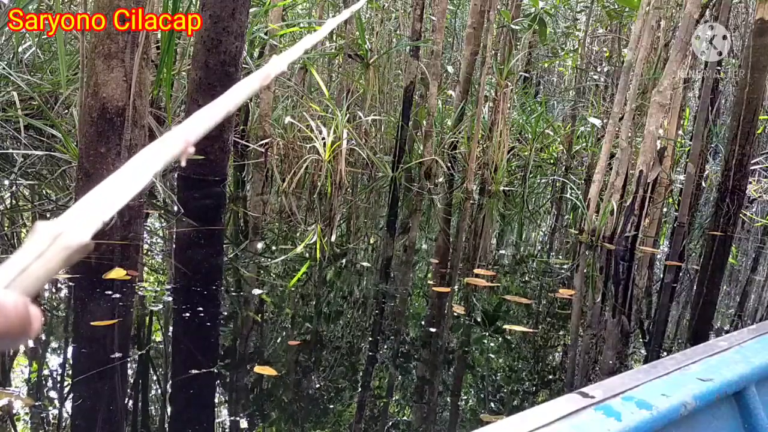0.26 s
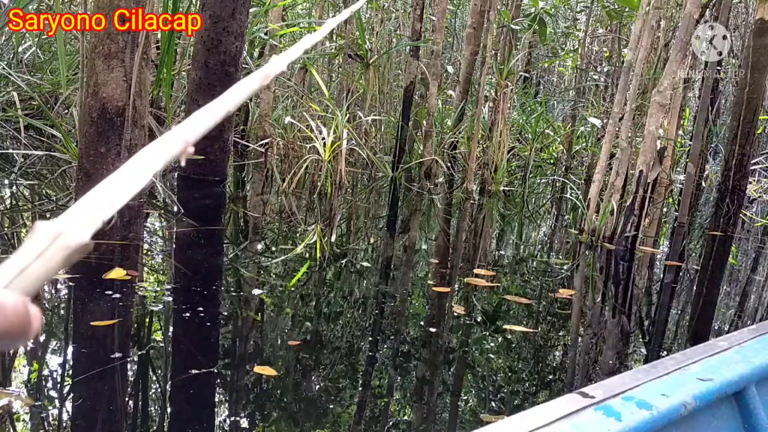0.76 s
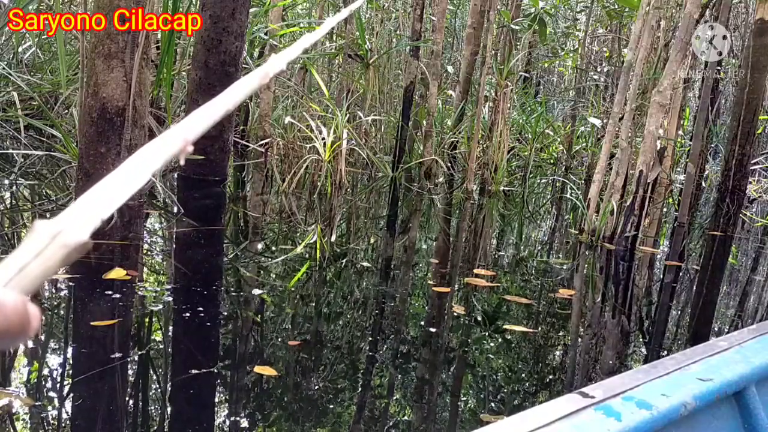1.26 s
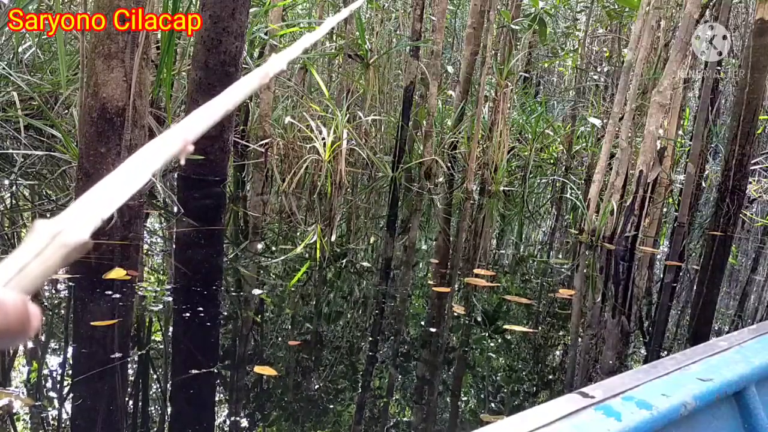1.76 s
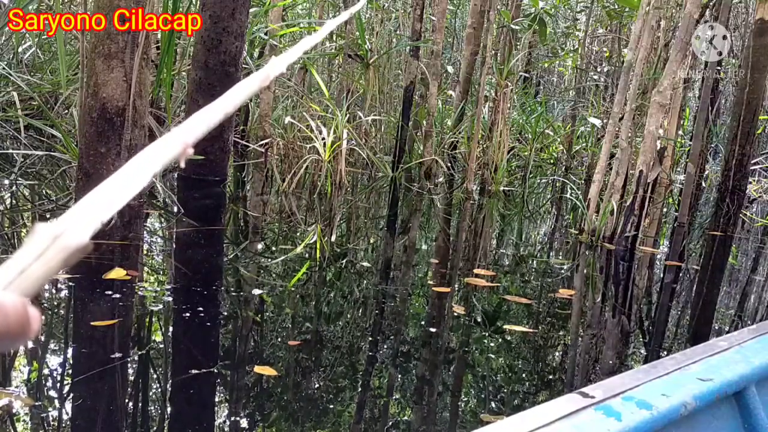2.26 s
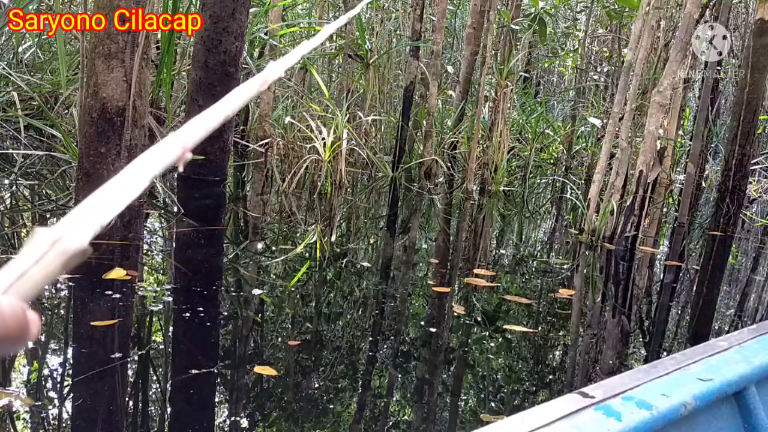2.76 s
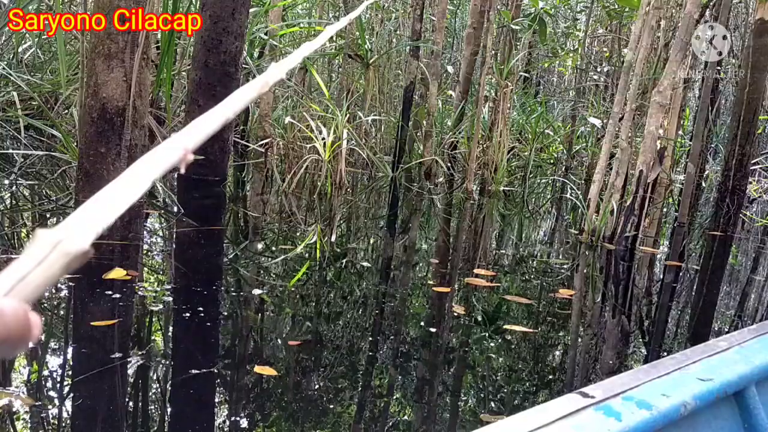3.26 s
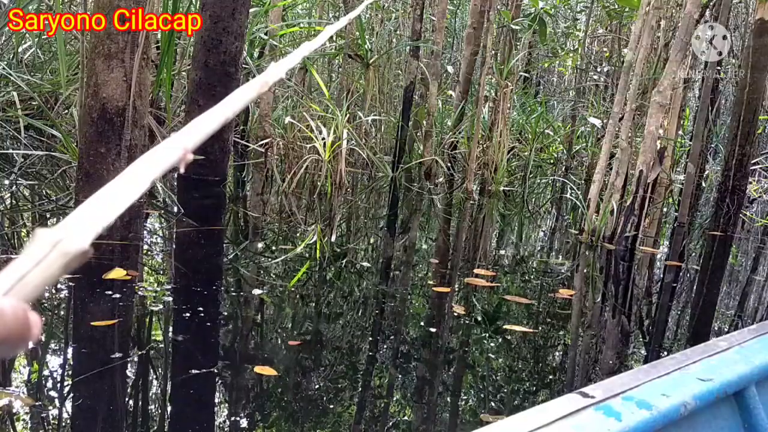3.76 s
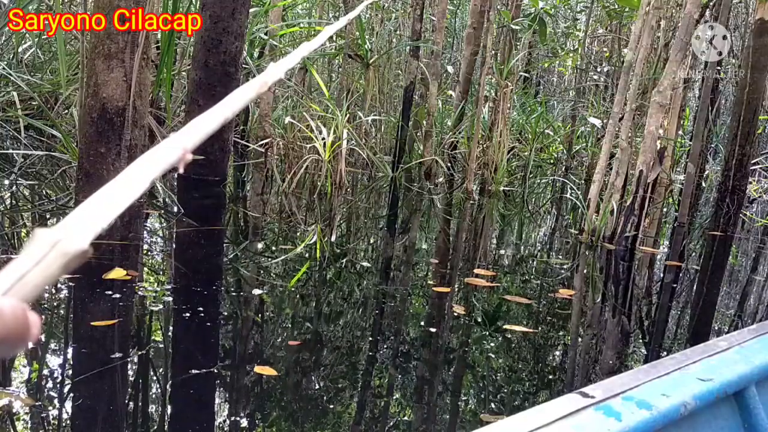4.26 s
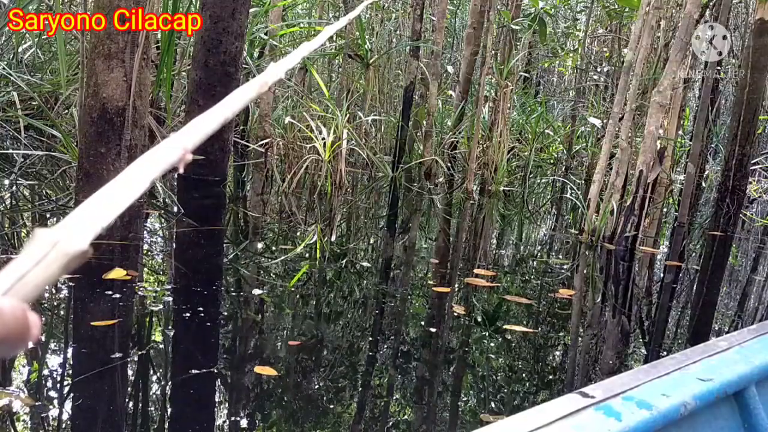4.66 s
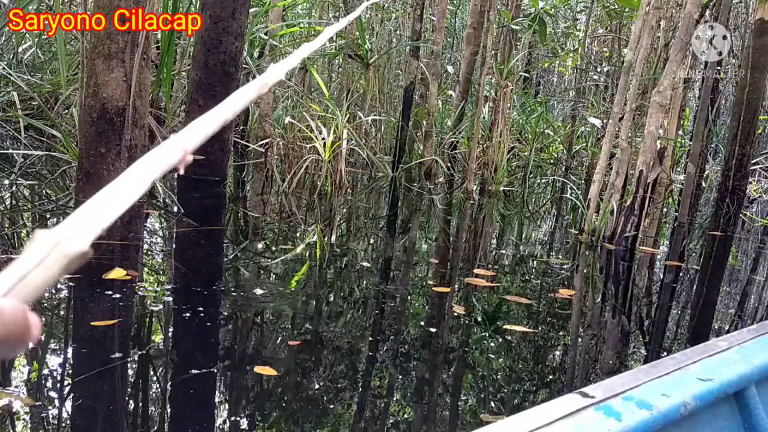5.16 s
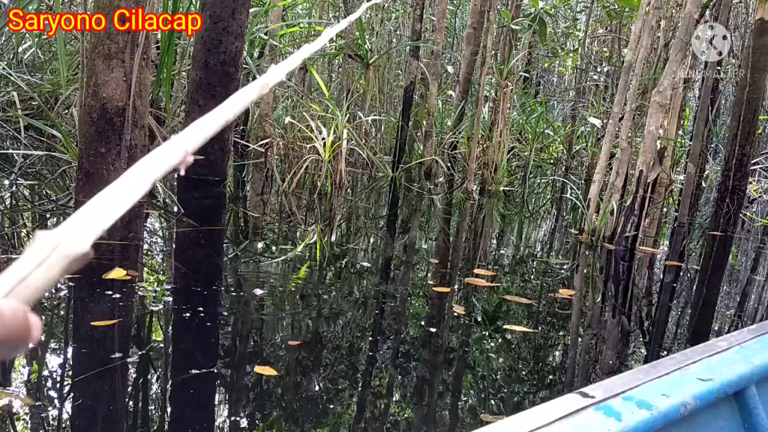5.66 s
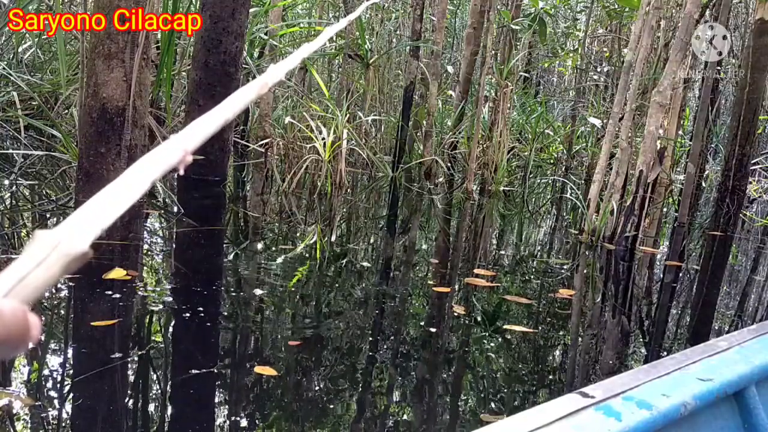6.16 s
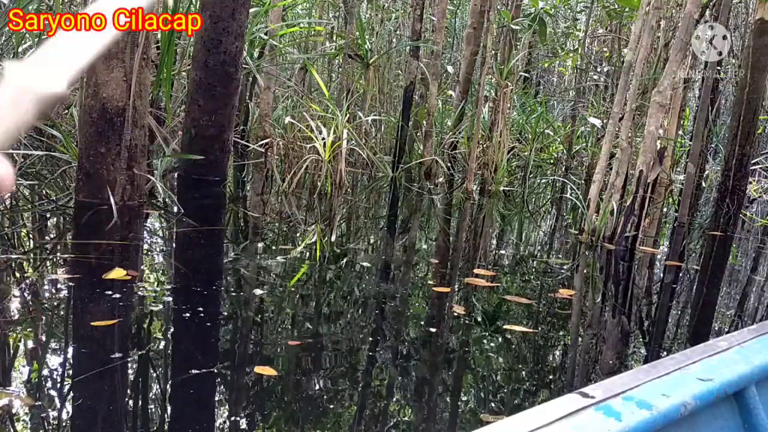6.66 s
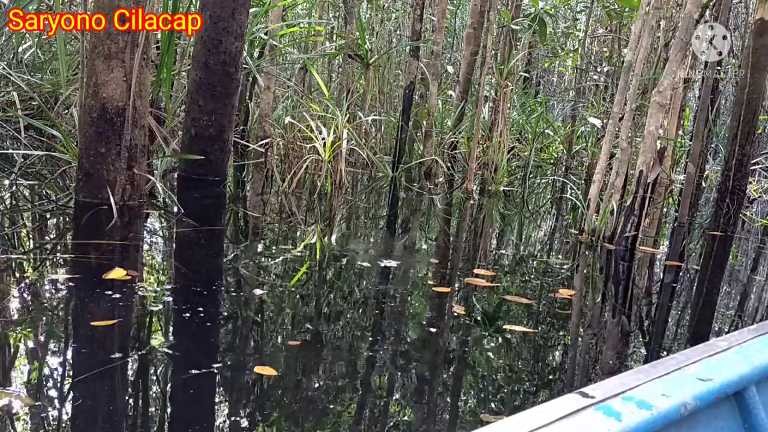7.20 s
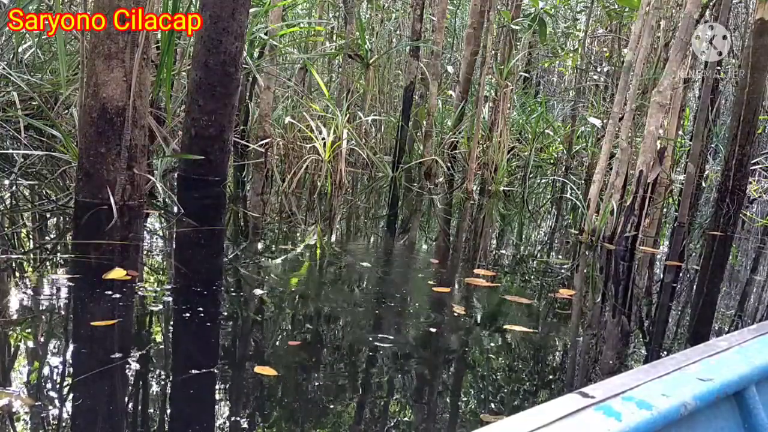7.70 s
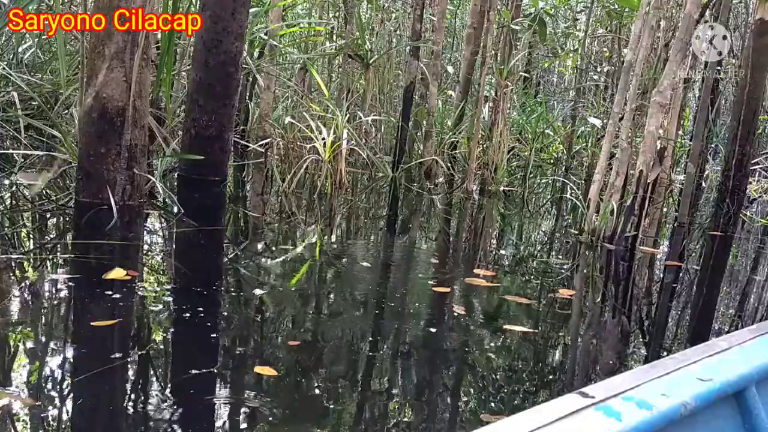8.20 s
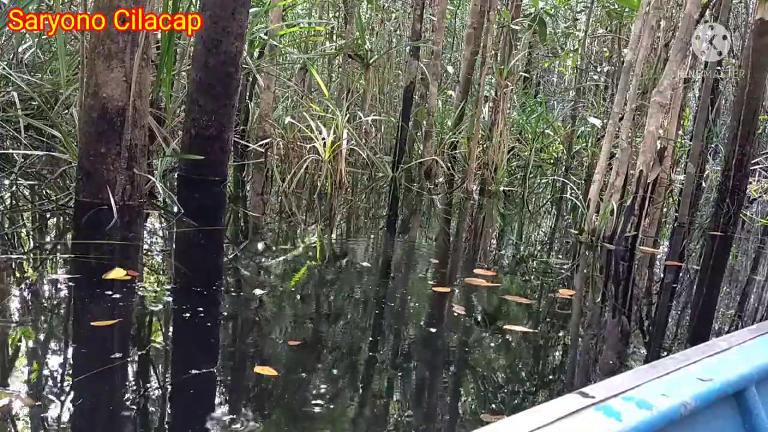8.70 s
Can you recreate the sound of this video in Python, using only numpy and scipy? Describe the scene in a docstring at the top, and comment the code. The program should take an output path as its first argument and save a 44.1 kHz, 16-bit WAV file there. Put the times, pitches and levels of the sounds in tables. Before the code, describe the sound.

Short bird whistles and ticks over a pulsing cicada buzz in a flooded forest, with gentle lapping water and a faint engine hum.

```python
"""A flooded forest, from a small boat. A near cicada clicks so fast that it drones, its belly pumping a
throb into the sound as it winds up; other insects scrape over a far chorus. One bird whistles
short glides and another ticks, with a faint echo from the trunks. Water gurgles along the hull as air
pockets ring, and a distant engine hums at multiples of its shaft rate."""
import sys
import numpy as np
from scipy import signal
from scipy.fft import rfft, irfft, next_fast_len
from scipy.io import wavfile
from scipy.ndimage import uniform_filter1d

SR = 44100
rng = np.random.default_rng(int(sys.argv[2]) if len(sys.argv) > 2 else 0)


def unload_audio(sound):
    """Save the sound as a 16-bit wav file, at the path given as the first command line argument."""
    columns = np.transpose(np.atleast_2d(sound))
    # keep every value between -1 and 1, then stretch to whole-number steps
    steps = np.round(np.clip(columns, -1, 1) * 32767)
    wavfile.write(sys.argv[1], SR, steps.astype(np.int16))


N = 394233
TIME_S = np.arange(N) / SR


def undb(db):
    return 10 ** (np.asarray(db) / 20)


def level(x, rms_db):
    return x * undb(rms_db) / np.sqrt(np.mean(x ** 2))


def phase_of(hz):
    return 2 * np.pi * np.cumsum(hz) / SR


def curves(table):
    """Every column after the time, as a value per sample."""
    time_s, *columns = np.transpose(table)
    return [np.interp(TIME_S, time_s, column) for column in columns]


def colour(x, eq):
    """Filter by an EQ curve; nothing passes below its first row."""
    size = next_fast_len(N)
    freq_hz, gain_db = np.transpose(eq)
    log_hz = np.log(np.arange(1, size // 2 + 2) * SR / size)
    db = np.interp(log_hz, np.log(freq_hz), gain_db, left=-120)
    return irfft(rfft(x, size) * undb(db), size)[..., :N]


def drift(rate_hz):
    """Smooth random modulation with a spread near 1."""
    hold = int(SR / rate_hz)
    steps = np.repeat(rng.standard_normal(N // hold + 1), hold)
    return 1.284 * uniform_filter1d(uniform_filter1d(steps, hold), hold)[:N]


def roughness(samples, depth, smooth_samples):
    """A gain that flickers around 1."""
    return 1 + depth * level(uniform_filter1d(rng.standard_normal(samples), smooth_samples), 0)


def place(out, start_s, sound, pan_db):
    """Mix in a one-shot; positive pan is to the left."""
    i = int(start_s * SR)
    sound = sound[:N - i]
    out[:, i:i + len(sound)] += sound * undb([[pan_db / 2], [-pan_db / 2]])


# The near cicada winding up: time_s, click_rate_hz, level_db
WIND_UP = [(0, 235, -76), (1.5, 238, -59), (2.1, 250.5, -50.5), (2.9, 252.6, -47.5), (3.7, 247.2, -46.5),
           (4.84, 244.2, -46), (5.4, 247.2, -45), (6.6, 249.4, -45), (7.4, 251, -46), (8.94, 260.4, -43.5)]
# Its tone colour: freq_hz, gain_db
CICADA_EQ = [(880, -50), (1500, -48), (2030, -3.5), (2200, -0.5), (2350, -10), (2700, 0.5), (3760, -7),
             (4850, 1), (5780, -7.5), (7820, -1.5), (9230, -15), (9990, -9), (13300, -20.5), (14500, -12),
             (15500, -48.5)]
def cicada(jitter=.0015, rasp=.42):
    """Even clicks make a comb of harmonics, each flickering and throbbing on its own; a rasp fills in."""
    click_rate_hz, level_db = curves(WIND_UP)
    phase = phase_of(click_rate_hz * (1 + jitter * drift(40)))
    comb = 0
    for k in range(6, 62):
        offset, throb_offset = 2 * np.pi * rng.random(2)
        comb += undb(3.05 * drift(14)) * throb(.99, throb_offset) * np.sin(k * phase + offset)
    effort = curves(BELLY_PUMP)[1]  # more effort, more even clicks
    song = (effort * level(comb, 0) + rasp * rng.standard_normal(N)) / np.hypot(effort, rasp)
    return level(colour(song, CICADA_EQ), level_db)


# The cicada's pumping belly: time_s, rate_hz, effort (0-1)
BELLY_PUMP = [(0, 20.7, 0.3), (2, 22, 0.29), (3.2, 22.5, 0.32), (4.0, 22.4, 0.26), (5, 22, 0.34),
              (5.8, 18.4, 0.31), (7.5, 18.1, 0.58), (8.1, 18, 0.28), (8.94, 17.8, 0.24)]
def throb(depth, offset_rad):
    """The belly pumps the level up and down, deeper with more effort."""
    rate_hz, effort = curves(BELLY_PUMP)
    return 1 + np.clip(depth * effort, 0, 1) * np.sin(phase_of(rate_hz) + offset_rad)


def follow_cicada(full_db, share, cicada_full_db=-45):
    """Level in dB of a layer that follows a share of the cicada's swell."""
    _, cicada_db = curves(WIND_UP)
    return full_db + share * (cicada_db - cicada_full_db)


def whistle(note, octave_db=-20, swing_hz=0):
    """A gliding sine with a faint octave, uneven breath and soft edges."""
    time_s, pitch_hz, level_db = np.transpose(note)[:3]
    t = np.arange(time_s[0], time_s[-1], 1 / SR)
    phase = phase_of(uniform_filter1d(np.interp(t, time_s, pitch_hz), 60) + swing_hz)
    tone = np.sin(phase) + undb(octave_db) * np.sin(2 * phase)
    edges = np.clip(np.minimum(t - time_s[0], time_s[-1] - t) / .0006, 0, 1)
    breath = roughness(len(t), depth=.27, smooth_samples=120)
    return np.sqrt(2) * undb(np.interp(t, time_s, level_db)) * edges * breath * tone


def chirp_shape(start_s, length_s, start_hz, middle_hz, end_hz, peak_db, peak_at=.32, edge_db=-9.5):
    """Breakpoints of a short whistle: the pitch bends through three points while the level arches."""
    progress = np.linspace(0, 1, 9)
    pitch_hz = np.interp(progress, [0, .5, 1], [start_hz, middle_hz, end_hz])
    off_peak = np.interp(progress, [0, peak_at, 1], [1, 0, 1])
    return np.transpose([start_s + length_s * progress, pitch_hz, peak_db + edge_db * off_peak ** 2])


def trill(start_s=7.568, step_s=.017, note_s=.014, top_hz=2900, sink_hz=54.9, peak_db=-37):
    """Chirp rows for five even notes that sink in pitch."""
    hz = top_hz - sink_hz * np.arange(6)
    return [(start_s + k * step_s, note_s, hz[k + 1], hz[k], hz[k + 1], peak_db) for k in range(5)]


# Short whistles: start_s, length_s, start_hz, middle_hz, end_hz, peak_db
CHIRPS = [(1.482, 0.011, 3450, 2900, 2500, -46), (1.5, 0.02, 2300, 1890, 1914, -44),
          (1.622, 0.02, 5500, 5500, 4800, -40), (1.632, 0.0093, 10100, 9950, 10100, -50),
          (1.64, 0.012, 6200, 6100, 5900, -40.5), (1.648, 0.014, 5900, 4850, 4200, -34.5),
          (1.659, 0.01, 4200, 3650, 3100, -42), (1.895, 0.016, 2400, 2550, 2650, -47),
          (1.911, 0.025, 2560, 3060, 3050, -41.5), (2.15, .055, 4150, 4270, 4250, -50),
          (2.275, .019, 6030, 6540, 6700, -49), (2.295, 0.0085, 6000, 4700, 4500, -38),
          (2.307, 0.061, 4800, 4950, 5500, -39), (2.418, 0.021, 3100, 3590, 3520, -38),
          (2.433, 0.017, 2750, 2710, 2450, -38), (2.465, 0.016, 2180, 1900, 1600, -47),
          (2.525, .028, 2060, 2160, 2550, -44.5), (2.553, 0.011, 2350, 2020, 1710, -44),
          (2.655, 0.0206, 2020, 2100, 2310, -44.5), (2.679, 0.012, 2280, 1930, 1600, -43),
          (2.812, 0.014, 5680, 4630, 4430, -38.5), (2.82, 0.0087, 4460, 4700, 4950, -35.5),
          (2.837, 0.01, 4400, 3400, 3000, -35.5), (2.849, .029, 3000, 3840, 4450, -36.5),
          (2.879, 0.0061, 4400, 4750, 5000, -35), (3.005, 0.031, 1890, 1960, 1970, -51.5),
          (3.09, 0.052, 1627, 1700, 1700, -51), (3.13, 0.041, 1750, 1862, 1680, -49),
          (3.384, 0.015, 2960, 2770, 2690, -40.5), (3.402, 0.009, 2950, 3250, 3670, -40),
          (3.407, .021, 3580, 3570, 3600, -38.5), (3.463, 0.007, 3870, 4100, 4000, -35),
          (3.467, 0.0144, 4180, 3500, 3000, -36), (3.485, .011, 3950, 3200, 3750, -39.5),
          (4.49, 0.016, 4900, 4980, 4900, -48), (4.535, 0.018, 5030, 4950, 4930, -46),
          (4.585, .015, 5000, 5100, 5040, -47), (4.67, 0.038, 5150, 5280, 5040, -46),
          (5.125, .035, 3660, 3560, 3740, -50), (5.225, .018, 5750, 5700, 5620, -48),
          (5.245, .02, 3687, 3550, 3520, -51), (5.56, 0.087, 5120, 5000, 4840, -52),
          (6.455, .055, 3474, 3600, 3430, -48), (6.58, 0.077, 5080, 4800, 4250, -51.5),
          (6.925, 0.081, 5170, 5030, 4990, -52), (7.248, .031, 3945, 3290, 3000, -35.5),
          (7.29, .025, 3040, 2990, 2900, -42), (7.37, 0.036, 2150, 2110, 2070, -46),
          (7.765, 0.029, 1910, 1890, 1960, -48), (7.857, 0.032, 1685, 1680, 1690, -47),
          (7.884, 0.048, 1663, 1840, 1740, -45.5), (8.15, .085, 5600, 5380, 5220, -52),
          (8.154, 0.012, 2900, 2780, 2680, -39), (8.173, .012, 2914, 3650, 3520, -37),
          (8.183, 0.011, 3470, 3420, 3080, -33), (8.228, 0.018, 4270, 3760, 3180, -36),
          (8.247, .011, 4030, 3500, 3850, -43)]
# Long whistles, one list of breakpoints each: time_s, pitch_hz, level_db
GLIDES = [
    [(3.285, 2635, -46), (3.308, 2660, -45), (3.327, 2800, -40), (3.345, 2890, -50), (3.384, 3040, -41)],
    [(7.062, 3146, -39), (7.08, 3390, -37.5), (7.115, 3500, -36.5), (7.132, 3700, -37), (7.15, 3810, -32),
     (7.167, 3715, -39), (7.185, 2994, -45)],
    [(7.48, 2744, -53), (7.495, 2890, -42), (7.52, 2790, -38), (7.555, 2800, -38.5), (7.567, 2575, -39)],
    [(8.02, 2630, -56), (8.044, 2580, -45), (8.068, 2600, -41.5), (8.092, 2793, -36), (8.117, 2870, -43.5),
     (8.153, 2953, -42)],
    [(8.9, 4780, -38), (8.92, 4880, -42), (8.94, 4840, -35)],
]
# One buzzed note: time_s, pitch_hz, level_db, flutter_hz
BUZZ = [(1.744, 2950, -52, 199), (1.77, 3300, -40, 206), (1.79, 3380, -36.5, 192), (1.814, 3080, -40, 175),
        (1.835, 2650, -46, 175)]
def whistling_bird(pan_db=.2, swing_hz=233, flutter_depth=.34):
    """Glides, chirps, a trill and a buzz whose flutter lifts pitch and level together."""
    out = np.zeros((2, N))
    for note in GLIDES + [chirp_shape(*row) for row in CHIRPS + trill()]:
        place(out, note[0][0], whistle(note), pan_db)
    time_s, _, _, flutter_hz = np.transpose(BUZZ)
    t = np.arange(time_s[0], time_s[-1], 1 / SR)
    flutter = -np.cos(phase_of(np.interp(t, time_s, flutter_hz)) + 1.5)
    buzz = whistle(BUZZ, swing_hz=swing_hz * flutter) * (1 + flutter_depth * flutter)
    place(out, t[0], buzz, pan_db)
    return out


# A small bird's run of ticks: start_s, peak_db, pitch_hz
TICKS = [(4.7165, -34.5, 7040), (4.7374, -43, 7200), (4.7511, -37, 7170), (4.7656, -35, 7250),
         (4.7794, -35, 7120), (4.812, -37, 7500), (4.8574, -33, 7130), (4.8834, -38, 7110),
         (4.9013, -36.5, 6940), (4.9222, -38, 7140), (4.94, -36.5, 7350), (4.9524, -40, 7300),
         (4.9796, -37, 7300), (5.005, -39, 7440), (5.015, -36, 7140), (5.0534, -36, 7340),
         (5.0715, -38, 7300), (5.0824, -36, 7400), (5.094, -36, 7060), (5.1134, -37, 7190),
         (5.1332, -39, 7110), (5.1515, -36, 7260), (5.1701, -35.5, 7150), (5.2595, -33, 7080),
         (5.2994, -33, 7300), (5.338, -34, 7380), (5.3805, -34, 7380), (5.461, -38, 6650),
         (5.5074, -33.5, 7390), (5.5616, -35.5, 7330), (5.6161, -39, 7430)]
def ticking_bird(width_s=.0037, slide_per_width=-.043):
    """Each tick is a tiny high pip that slides down through its pitch."""
    out = np.zeros((2, N))
    widths = np.arange(-.004, .008, 1 / SR) / width_s
    for start_s, peak_db, pitch_hz in TICKS:
        pip = np.exp(-widths ** 2) * np.sin(phase_of(pitch_hz * (1 + slide_per_width * widths)))
        place(out, start_s, undb(peak_db) * pip, pan_db=5)
    return out


def trunk_echo(calls, t60_s=.24, send_db=-44):
    """Many trunks scatter the calls back as a short stereo tail."""
    t = np.arange(int(t60_s * SR)) / SR
    tail = rng.standard_normal((2, len(t))) * undb(-60 * t / t60_s)
    return undb(send_db) * signal.fftconvolve(calls, tail, axes=1)[:, :N]


def wing_scrape(centre_hz, half_width_hz, level_db, gain, clicks=0):
    """Dense wing scrapes, and any even clicks, ring around one resonance."""
    edges_hz = [centre_hz - half_width_hz, centre_hz + half_width_hz]
    band = signal.butter(2, edges_hz, "bandpass", fs=SR, output="sos")
    scrape = level(signal.sosfilt(band, rng.standard_normal(N)), 0)
    ring = scrape + signal.sosfilt(band, clicks + np.zeros(N))
    return level(ring, level_db + .72 * drift(4.7)) * gain


def even_clicks(rate_hz, around_hz):
    """The nine harmonics of a click train nearest one resonance, each flickering."""
    phase = phase_of(rate_hz * (1 + .0007 * drift(6)))
    centre = round(around_hz / rate_hz)
    return sum(undb(2.4 * drift(8)) * np.sin(k * phase + 2 * np.pi * rng.random())
               for k in range(centre - 4, centre + 5))


def scraping_insects(stop_s=.7, fade_s=.06, swell_db_per_s=5):
    """A low and a shrill ring build with the cicada; a third swells early and falls silent."""
    low = wing_scrape(2690, 142, follow_cicada(-52, share=.28), throb(.51, .76))
    clicks = .45 * even_clicks(rate_hz=160.5, around_hz=14870)
    shrill = wing_scrape(14900, 330, follow_cicada(-50.5, share=1.5), throb(1, 2.2), clicks)
    fade_out = np.clip((stop_s - TIME_S) / fade_s + .5, 0, 1)
    early = wing_scrape(15300, 500, -58 + swell_db_per_s * np.minimum(TIME_S, stop_s), fade_out)
    return low + shrill + early


# Two narrow tones in the insect drone: time_s, low_hz, high_hz, high_boost_db
DRONE_TONES = [(0, 1995, 2716, 4.5), (2.001, 2093, 2674, 1.5), (3.3, 2234, 2703, 3.5),
               (4.0, 2174, 2693, 2.5), (4.6, 2157, 2614, 7), (5.3, 2180, 2680, -2), (6.2, 2233, 2657, 0.5),
               (7.0, 2248, 2683, 2), (7.8, 2234, 2716, -3), (8.94, 2229, 2710, -3)]
# Their mix, low then high: full_db, share (of the cicada's swell)
DRONE_TONE_MIX = [(-58, 0.3), (-57.5, 0.25)]
def drone_tones(waver=.00392):
    """Two narrow tones that waver in pitch and throb with the cicada."""
    out = 0
    low_hz, high_hz, high_boost_db = curves(DRONE_TONES)
    tones = [(low_hz, 0, 1.7), (high_hz, high_boost_db, .4)]
    for (pitch_hz, boost_db, offset_rad), (full_db, share) in zip(tones, DRONE_TONE_MIX):
        phase = phase_of(pitch_hz * (1 + waver * drift(25)))
        level_db = follow_cicada(full_db, share) + boost_db + 1.9 * drift(13)
        out += np.sqrt(2) * undb(level_db) * throb(.99, offset_rad) * np.sin(phase)
    return out


# Tone colour of the far insects: freq_hz, gain_db
CHORUS_EQ = [(820, -17.5), (1400, -23), (1890, -0.5), (2180, 0.5), (2410, 3), (3190, -7), (4360, -4.5),
             (5280, -9), (6270, -11), (6860, -8.5), (7980, -5.5), (9190, -19.5), (12500, -14.5),
             (14400, -4), (15500, -9)]
def far_chorus(start_db=-48, swell_db_per_s=.25):
    """Far insects blur into a slowly swelling bed in the centre."""
    return level(colour(rng.standard_normal(N), CHORUS_EQ), start_db + swell_db_per_s * TIME_S)


def bubble(pitch_hz, decay_cycles, rise):
    """An air pocket rings and climbs in pitch as it nears the surface; the broken surface roughens it."""
    cycles = np.arange(int(4 * decay_cycles * SR / pitch_hz)) * pitch_hz / SR
    envelope = (1 - np.exp(-cycles / 1.4)) ** 2 * np.exp(-cycles / decay_cycles)
    splash = roughness(len(cycles), depth=.25, smooth_samples=260)
    return envelope * splash * np.sin(2 * np.pi * cycles * (1 + rise * (cycles / decay_cycles - 1)))


# Fader ride of the gurgle along the hull: time_s, gain_db
GURGLE_RIDE = [(0, -65), (1.0, -57), (1.55, -56.5), (1.72, -62), (2.25, -60.5), (2.7, -56), (2.9, -64),
               (3.4, -62), (3.7, -64), (4.4, -60.5), (5.75, -56.5), (6.9, -55.5), (7.2, -59), (7.7, -59.5),
               (8.05, -56), (8.22, -65), (8.94, -61)]
# Tone colour of the wash: freq_hz, gain_db
WASH_EQ = [(150, -40), (260, -8.5), (400, -2), (600, 0.5), (850, 2), (1300, 0), (1800, 1.5), (2400, -18),
           (4000, -80)]
# Bubbles that stand out: start_s, gain_db, pitch_hz, pan_db
LOUD_BUBBLES = [(0.194, -47.5, 1010, 11), (0.312, -49, 1150, -4), (0.633, -48, 1180, 8),
                (0.839, -44, 679, 2.5), (0.936, -48.5, 507, 11), (1.01, -43, 1010, -5),
                (1.454, -48, 940, 7), (1.548, -54, 710, 3.5), (2.53, -50, 1050, -10), (2.739, -55, 685, 7),
                (3.8, -53, 470, 8), (4.299, -57, 354, 6), (4.477, -48, 875, 14), (4.772, -44.5, 800, 13),
                (4.901, -45.5, 546, 6), (5.04, -40, 852, 11), (5.276, -48, 777, 12), (5.748, -48, 735, 4),
                (5.823, -42, 641, -0.5), (5.878, -47, 939, 3.0), (5.914, -47, 544, 1),
                (5.991, -48, 1024, -1.0), (6.143, -46, 638, -2.5), (6.199, -43, 939, 3.0),
                (6.362, -51, 776, 15), (6.398, -47, 1267, 15), (6.451, -49, 744, 6.5),
                (6.485, -48, 430, 12), (6.692, -46, 918, 7), (6.774, -43, 806, 13), (6.806, -45, 990, 1.0),
                (6.928, -48, 620, 4.0), (6.988, -42, 1120, -8), (7.06, -42, 890, 8),
                (7.543, -47, 810, -0.5), (7.716, -49, 1170, -9), (7.897, -48, 1140, -1.0),
                (7.922, -44.5, 466, -2), (8.05, -47, 934, -1), (8.123, -42, 935, -1.0),
                (8.498, -52.5, 664, -5)]
def hull_water(bubble_count=1200, cluster_s=.06):
    """Laps set off clusters of small bubbles over a wash, leaning left; loud bubbles ring on top."""
    small, loud = np.zeros((2, N)), np.zeros((2, N))
    laps = rng.random((bubble_count // 4, 3))
    for k, (lag, detune, size, life) in enumerate(rng.random((bubble_count, 4))):
        when, register, position = laps[k % len(laps)]
        start_s = min(when * N / SR + cluster_s * lag, N / SR)
        pitch_hz = 450 * 2.8 ** register * 1.8 ** (detune - .5)
        plip = bubble(pitch_hz, decay_cycles=(2.6 + 6 * life) * pitch_hz / 800, rise=.0443)
        place(small, start_s, plip * (1 - size) ** -.17, pan_db=7.3 + 22 * (position - .5))
    for start_s, gain_db, pitch_hz, pan_db in LOUD_BUBBLES:
        place(loud, start_s, undb(gain_db) * bubble(pitch_hz, decay_cycles=8.4, rise=.044), pan_db)
    mid, side = colour(rng.standard_normal((2, N)), WASH_EQ)
    wash = np.array([undb(1.5) * (mid + .56 * side), mid - .66 * side])
    gurgle = level(small, -4.5) + level(wash, -2.5)
    return gurgle * undb(curves(GURGLE_RIDE)[0]) + loud


# Engine speed, throttled back once: time_s, shaft_hz
SHAFT_SPEED = [(0, 42.6), (1.9, 43.05), (3.6, 42.3), (4.1, 43.35), (5.55, 43.3), (5.7, 40.5), (5.87, 38.8),
               (6.15, 40.8), (6.6, 41.24), (8.94, 41.6)]
# Shaft harmonics 1-5 as the engine draws away: start_db, slope_db_per_s, boost_db_per_hz (of sag)
SHAFT_HARMONICS = [(-80, 0.5, -7), (-67.5, -0.76, -1.3), (-78, -1.86, 5), (-64, -1.74, 0),
                   (-74.5, -2.87, -10)]
# Tone colour of the rumble: freq_hz, gain_db
RUMBLE_EQ = [(8, -9), (20, -5.5), (60, -10), (110, -12.5), (170, -11), (230, -17.5), (300, -19.5),
             (400, -58)]
def distant_engine(cruise_hz=42, rumble_db=-73):
    """Shaft harmonics hum over a low rumble; their balance shifts when the speed sags below cruise."""
    shaft_hz, = curves(SHAFT_SPEED)
    phase = phase_of(shaft_hz)
    sag_hz = np.maximum(cruise_hz - shaft_hz, 0)
    hum = 0
    for k, (start_db, slope, boost) in enumerate(SHAFT_HARMONICS):
        level_db = start_db + slope * TIME_S + boost * sag_hz + .8 * drift(6.5)
        hum += np.sqrt(2) * undb(level_db) * np.sin((k + 1) * phase + k)
    mid, side = colour(rng.standard_normal((2, N)), RUMBLE_EQ)
    return hum + level(np.array([mid + .072 * side, mid - .16 * side]), rumble_db)


# Tone colour of a faint, wide stereo hiss: freq_hz, gain_db
HISS_EQ = [(880, -32), (1500, -13), (3540, 9), (4700, 4), (5110, -7), (5940, -6), (7310, -34), (8490, -23),
           (11000, -28), (14300, -53), (22000, -120)]
def wide_hiss(level_db=-68.5):
    """A faint hiss, opposite in polarity left and right, adds width."""
    side = level(colour(rng.standard_normal(N), HISS_EQ), level_db + .32 * drift(3.015))
    return np.array([side, -side])


def scene():
    insects = cicada() + scraping_insects() + drone_tones() + far_chorus()
    hiss = wide_hiss()
    birds = whistling_bird() + ticking_bird()
    return insects + birds + trunk_echo(birds) + hull_water() + distant_engine() + hiss


def record(dry):
    """A steep high cut on the whole mix."""
    cutoff_hz = 15520
    return signal.sosfilt(signal.ellip(14, .2, 75, cutoff_hz, fs=SR, output="sos"), dry)


dry = scene()
out = record(dry)
unload_audio(out)
```